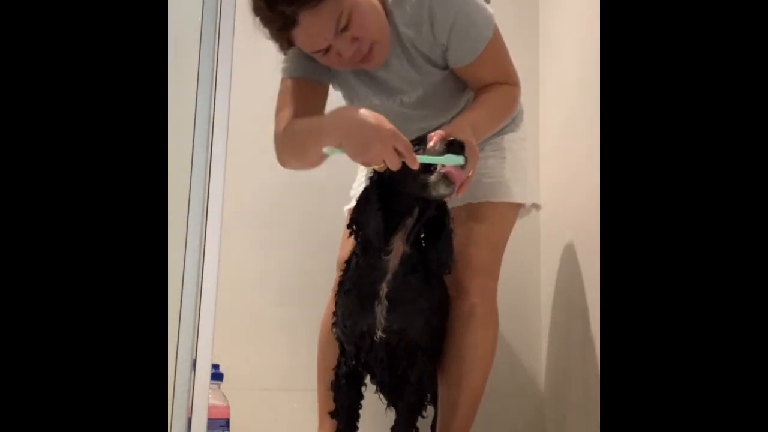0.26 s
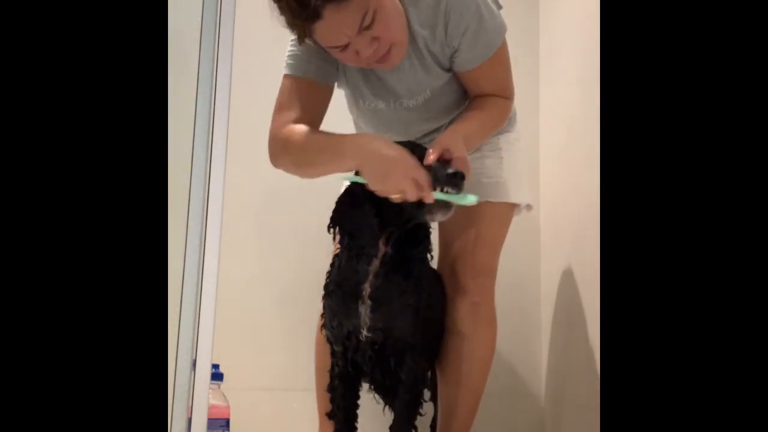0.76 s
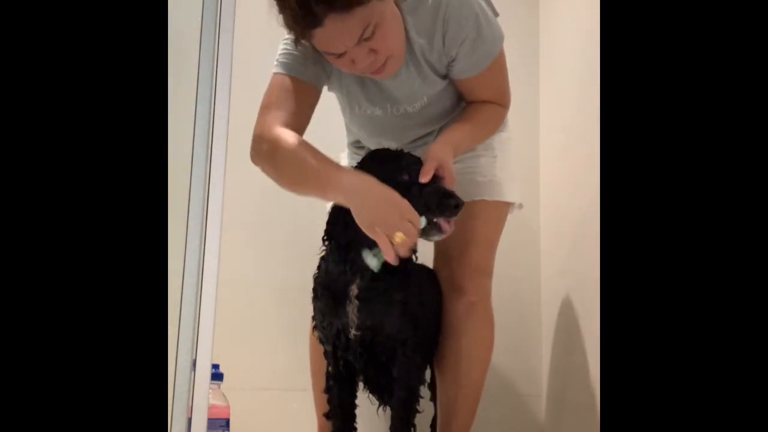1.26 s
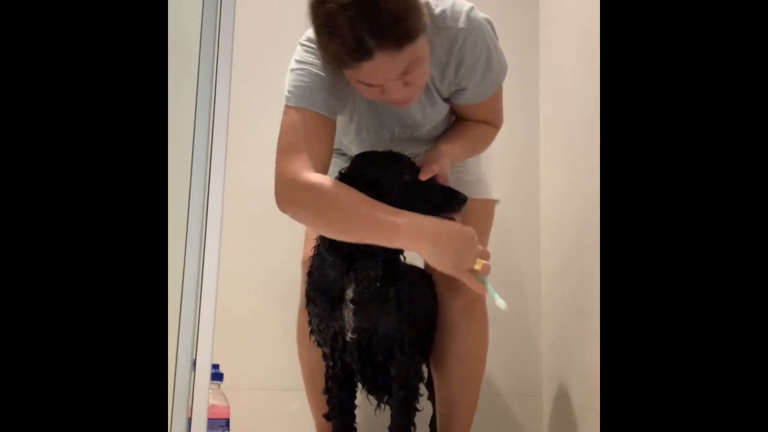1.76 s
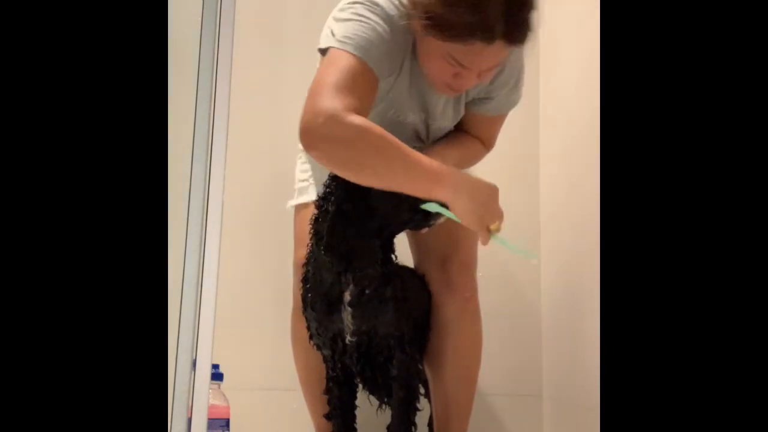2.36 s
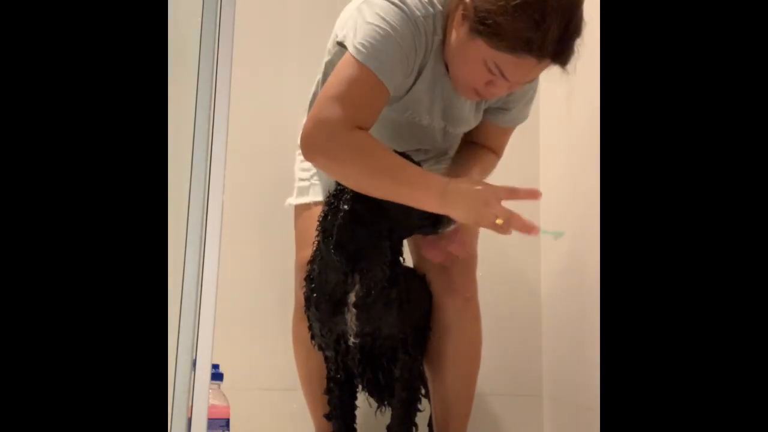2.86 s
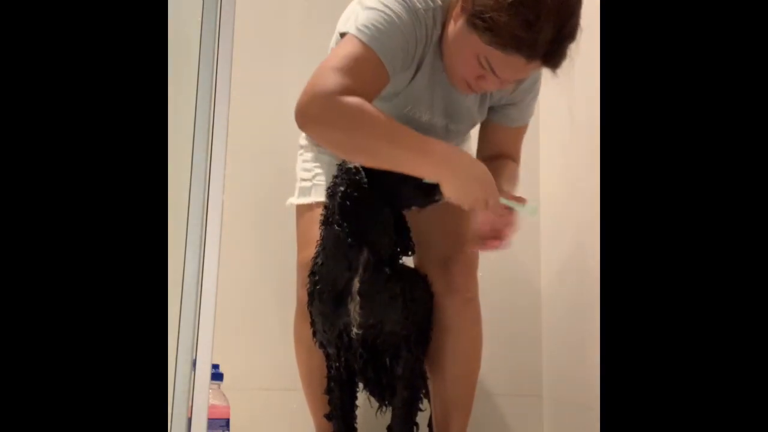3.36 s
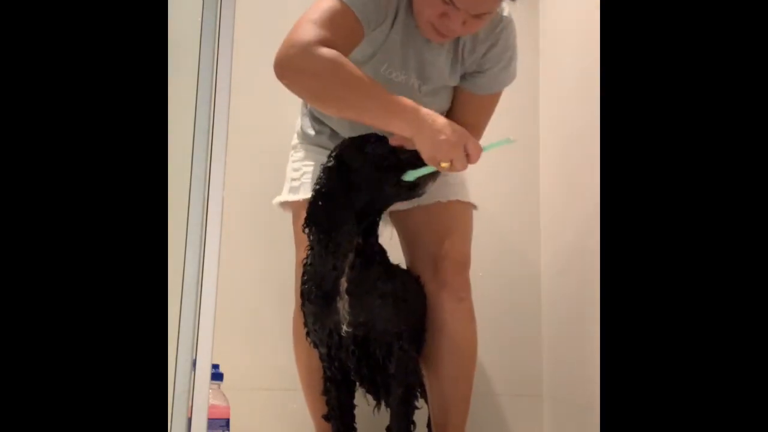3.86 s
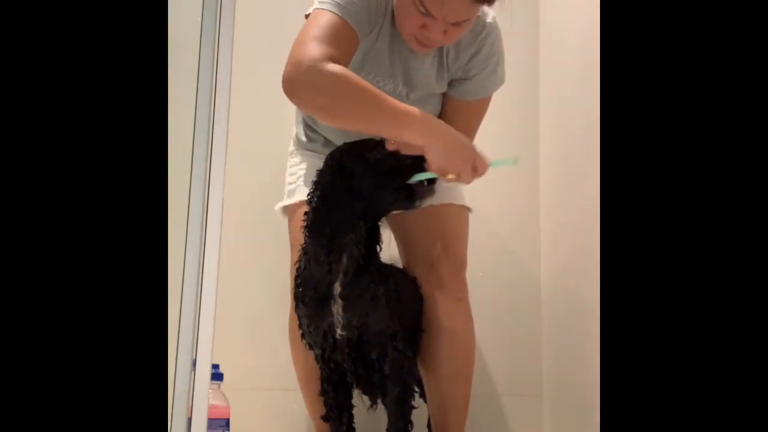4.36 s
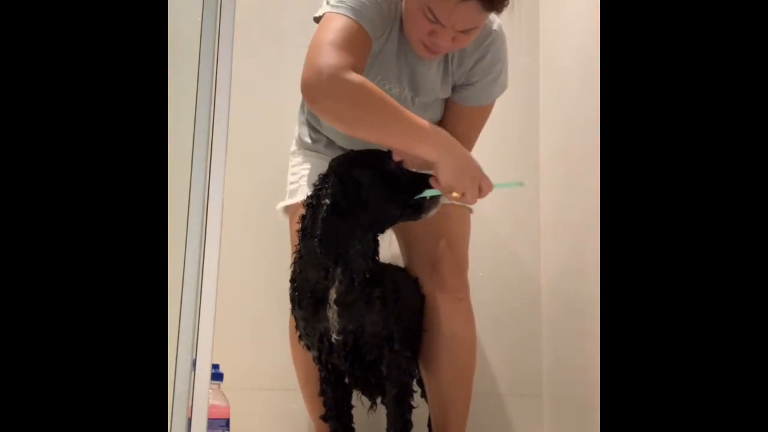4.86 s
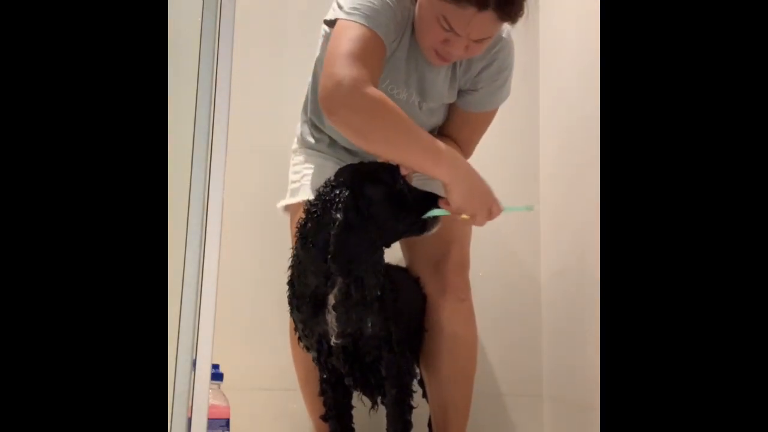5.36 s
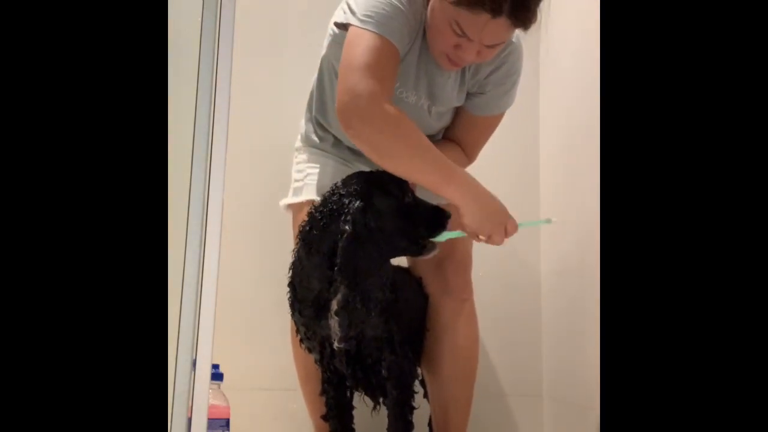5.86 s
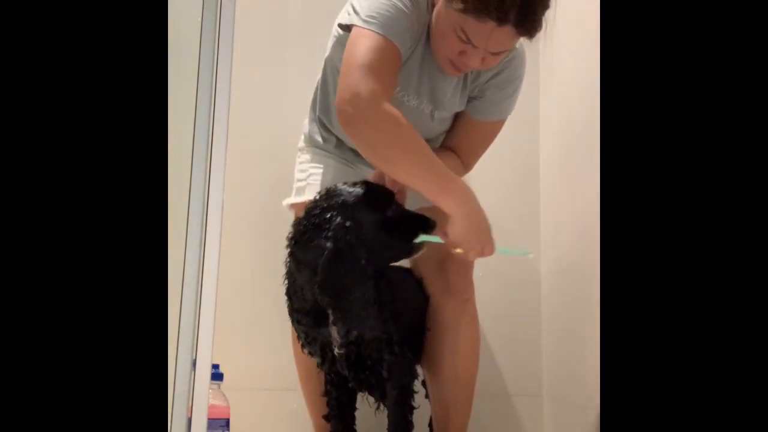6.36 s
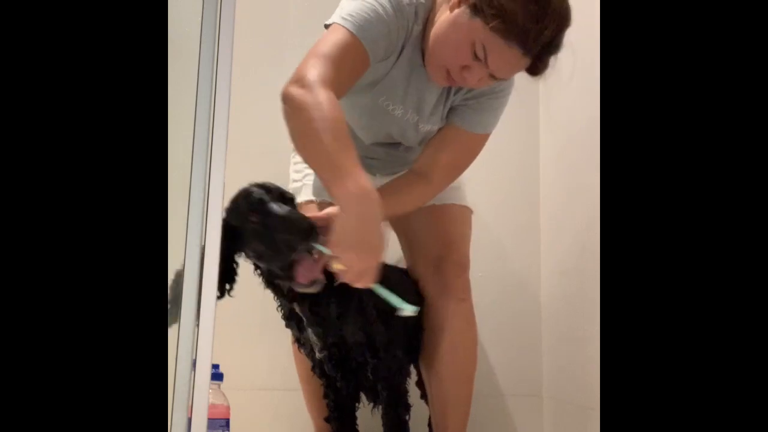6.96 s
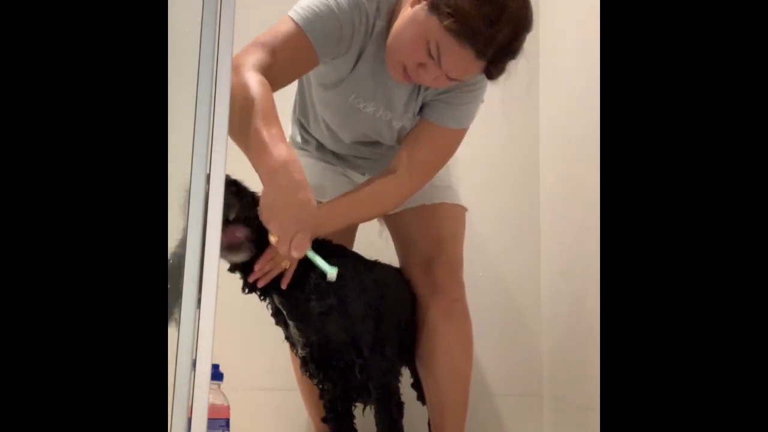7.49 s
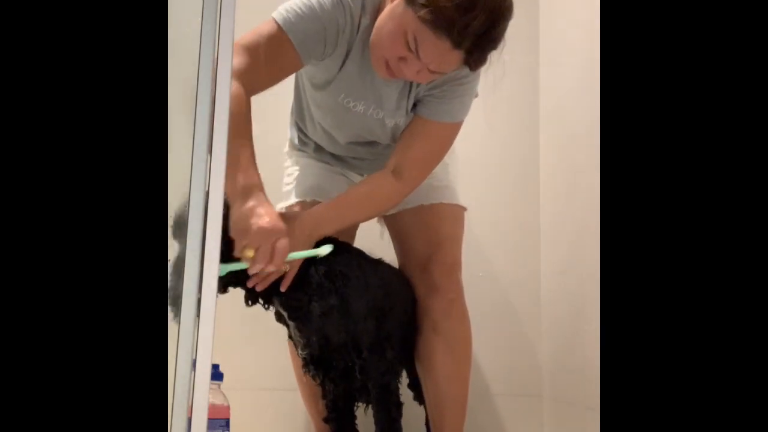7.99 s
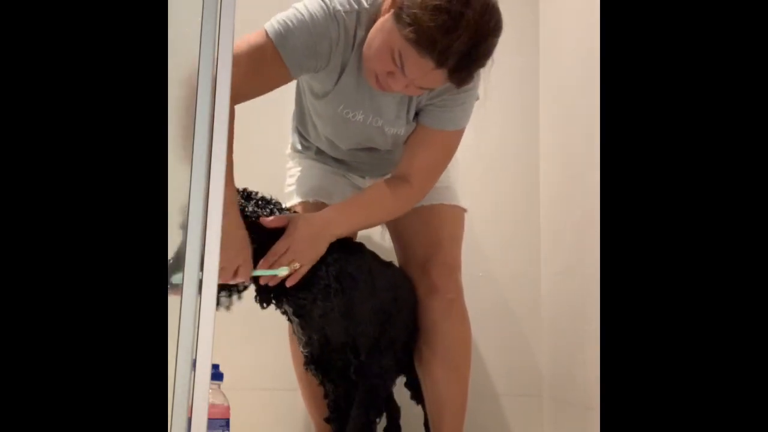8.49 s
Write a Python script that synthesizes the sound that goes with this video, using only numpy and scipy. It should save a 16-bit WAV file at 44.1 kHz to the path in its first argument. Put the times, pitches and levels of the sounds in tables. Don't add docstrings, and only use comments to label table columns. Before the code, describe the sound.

A toothbrush scrubs a wet dog's teeth in quick hissing strokes, with hollow mouth clicks and smacks, over a low fan rumble in a tiled bathroom.

```python
import sys
import numpy as np
from scipy import signal
from scipy.fft import rfft, irfft, next_fast_len
from scipy.io import wavfile
from scipy.ndimage import uniform_filter1d, map_coordinates

SR = 44100
rng = np.random.default_rng(int(sys.argv[2]) if len(sys.argv) > 2 else 0)


def gain_from_db(level_db):
    decades = np.asarray(level_db, float) / 20
    return 10 ** decades


def to_wav(sig):
    pcm = np.clip(np.atleast_2d(sig), -1, 1) * 32767
    pcm = np.round(pcm).astype(np.int16)
    wavfile.write(sys.argv[1], SR, pcm.T)


N = 384993

# start_s, peak_db
BRISTLE_FLICKS = [(0.406, -48), (0.535, -40), (1.602, -49), (1.68, -44), (1.7463, -47), (2.0855, -48),
                  (2.549, -43.5), (2.694, -41), (3.0805, -47), (3.096, -37), (3.2094, -40), (3.253, -38),
                  (3.8531, -48), (4.0877, -43), (4.3045, -48), (4.3327, -43.5), (4.511, -54), (4.6778, -45),
                  (5.474, -51), (5.5802, -47), (6.3227, -39), (6.784, -45), (6.8974, -44), (7.4325, -53),
                  (7.585, -38), (7.992, -43), (8.049, -34)]
# start_s, peak_db, body_db
HEAD_CATCHES = [(0.697, -45, 14), (0.7253, -65, -1), (0.74, -36, 3.5), (0.831, -45, 8), (1.137, -49, -12),
                (1.1458, -28.5, 8), (1.8842, -44, 0.5), (2.1306, -43, -13), (2.1969, -64, 0),
                (3.5224, -48, -5), (4.404, -52, -13), (4.86, -40.5, -5), (4.9432, -43, -5),
                (4.9806, -37, 6.5), (5.764, -36, -3), (5.8142, -54, -5), (6.493, -47.5, 9.5),
                (6.631, -42, 13), (7.1497, -50, 1), (7.3, -48, 11), (8.544, -45.5, 3)]


def unit(x):
    return x / np.sqrt(np.mean(x ** 2) + 1e-20)


def along(points, hz):
    f, v = np.transpose(points)
    return np.interp(np.log(hz + 1), np.log(f + 1), v)


def curves(rows):
    s, *columns = np.transpose(rows)
    return [np.interp(np.arange(N) / SR, s, column) for column in columns]


def during(rows):
    t = np.arange(N) / SR
    return np.clip(np.minimum(t - rows[0][0], rows[-1][0] - t) / .003, 0, 1)


def wobble(rate):
    knots = rng.standard_normal(int(N * rate / SR) + 4)
    return map_coordinates(knots, [np.arange(N) * rate / SR])


def filtered(x, response):
    n = x.shape[-1]
    m = next_fast_len(n + 4096)
    return irfft(rfft(x, m) * response(np.fft.rfftfreq(m, 1 / SR)), m)[..., :n]


def humps(modes, hz):
    return gain_from_db(sum(db / (1 + ((hz - c) * 2 / w) ** 2) for c, w, db in modes))


def tiles(x):
    # pitch_hz, fade_s
    fade_times = [(400, 0.59), (1300, 0.44), (3500, 0.51), (9000, 0.13), (15000, 0.017)]
    hz, t, z = signal.stft(rng.standard_normal((2, SR * 2 // 5)), SR, nperseg=256)
    fade = gain_from_db(-60 * t / along(fade_times, hz)[:, None])
    tail = signal.istft(z * fade, SR, nperseg=256)[1]
    tail_t = np.arange(tail.shape[1]) / SR
    tail = tail * (1 - np.exp(-(tail_t / 0.0039) ** 2))
    return signal.fftconvolve(x[None], tail / np.linalg.norm(tail[0]), axes=1)


def vent():
    # pitch_hz, level_db
    rumble_colour = [(10, -14), (22, 5), (40, -7.5), (80, -7), (300, -14.5), (400, -18.5), (750, -20),
                     (1250, -29), (1550, -24), (1750, -33), (2600, -41), (6000, -34.5), (16000, -56.5)]
    # pitch_hz, width_hz, gain_db
    room_modes = [(60, 22, 7), (99, 12, 8), (137, 12, 7), (177, 12, 8), (240, 16, 5), (290, 16, 4),
                  (350, 30, 5)]
    # time_s, thrum_db
    duct_pull = [(0, -52), (.9, -53), (1.17, -56), (1.6, -47), (2.16, -51), (2.63, -47), (2.8, -53.5),
                 (4.2, -51), (4.9, -53), (7.5, -53.5), (7.71, -53.5), (8.09, -57.5), (8.6, -48),
                 (8.73, -48.5)]
    thrum_db, = curves(duct_pull)
    air_db = -54 + 0.11 * (thrum_db - thrum_db.mean())
    air_db = air_db + 0.6 * wobble(3)

    def colour(hz):
        deep = 1 / (1 + (hz / 88) ** 8)
        share = np.sqrt([1 - deep, deep])[:, None]
        return gain_from_db(along(rumble_colour, hz)) * humps(room_modes, hz) * share

    air, thrum = filtered(rng.standard_normal((2, 2, N)), colour)
    return gain_from_db(air_db) * unit(air) + gain_from_db(thrum_db + 1.84 * wobble(4)) * unit(thrum)


def scratch(spectrum, grain_db, grain_rate, patchy_db):
    noise = gain_from_db(grain_db * wobble(grain_rate)) * rng.standard_normal((2, N))
    z = signal.stft(noise, nperseg=512)[2]
    patches = uniform_filter1d(rng.standard_normal(z.shape[1:]), 9, 0)
    patches = uniform_filter1d(patches, 12, 1)
    grains = signal.istft(z * gain_from_db(patchy_db * unit(patches)), nperseg=512)[1][:, :N]
    return unit(filtered(grains, lambda hz: gain_from_db(along(spectrum, hz))))


def strokes():
    # start_s, hold_s, tips_db, rub_over_tips_db
    brush_strokes = [(0.002, 0.085, -57, -1.5), (0.154, 0.059, -52.5, -6.5), (0.266, 0.095, -53.5, -5),
                     (0.424, 0.052, -50, -14), (0.553, 0.057, -49.5, -8), (0.742, 0.002, -52, -5),
                     (0.846, 0.18, -50.5, -14), (1.149, 0.026, -48, -0.5), (1.403, 0.022, -66.0, -3),
                     (1.678, 0.039, -58, -3.5), (1.885, 0.025, -54.5, -6), (2.145, 0.044, -60.5, -0.5),
                     (2.211, 0.14, -58, -5), (2.376, 0.063, -59, -5), (2.51, 0.082, -68.5, 4.5),
                     (2.644, 0.089, -60, -3.5), (2.793, 0.13, -56, -5), (3.115, 0.001, -54.5, -2.5),
                     (3.22, 0.22, -60, -4.5),
                     (3.565, 0.11, -57.5, -4), (3.768, 0.12, -60, -7), (3.968, 0.056, -59.5, -3.5),
               (4.073, 0.1, -57, -6), (4.305, 0.045, -58.5, -6), (4.431, 0.019, -54, -8),
               (4.537, 0.005, -51, -6.5), (4.683, 0.001, -53.5, -4), (4.873, 0.002, -57.5, -4),
               (4.965, 0.16, -57, 0), (5.202, 0.12, -57.5, -2), (5.475, 0.021, -58, -18),
               (5.576, 0.13, -63.5, 3), (5.767, 0.06, -53.5, 0.5), (5.886, 0.25, -62, -2.5),
               (6.185, 0.035, -60.5, -1.5), (6.329, 0.001, -50.5, -9), (6.506, 0.087, -57, 2),
               (6.654, 0.049, -53.5, -3.5), (6.785, 0.049, -56, -4.5), (6.897, 0.24, -61.5, -2.5),
               (7.158, 0.008, -58, 1), (7.436, 0.051, -51.5, -10), (7.583, 0.14, -57.5, -3.5),
               (7.819, 0.061, -59, -3), (8.041, 0.085, -55.5, 0), (8.232, 0.03, -58, -3),
               (8.362, 0.051, -66, 2), (8.559, 0.0099, -57, 2.5), (8.638, 0.026, -55.5, -0.5)]
    press_db_per_s, lift_db_per_s = 608, 122.5
    tips_rest_db, rub_rest_db = -94, -65
    s, hold, db, rub_db = np.transpose(brush_strokes)[..., None]
    t = np.arange(0, N / SR + .004, .002)
    pressing = (s - t) * press_db_per_s
    lifting = (t - s - hold) * lift_db_per_s
    tips_db = db - np.maximum(0, np.maximum(pressing, lifting))

    def total(parts_db, rest_db):
        return np.sqrt((gain_from_db(parts_db) ** 2).sum(axis=0) + gain_from_db(rest_db) ** 2)

    tips_gain = total(tips_db, tips_rest_db)
    rub_gain = total(tips_db + rub_db, rub_rest_db)
    return curves(np.transpose([t, tips_gain, rub_gain]))


def brush():
    # pitch_hz, level_db
    tips_colour = [(5000, -15.5), (7000, 2), (8200, -6.5), (9500, -1), (11000, 2.5), (13000, -5),
                   (15500, -3), (17000, -9.5)]
    rub_colour = [(1500, -8), (2800, -5.5), (4000, -5), (4800, -1.5), (6400, -0.5), (8200, -1.5),
                  (9500, -8), (12000, -16.5)]
    tips_gain, rub_gain = strokes()
    tips = scratch(tips_colour, grain_db=1.0, grain_rate=360, patchy_db=2.0)
    tips = tips_gain * gain_from_db(-3.5 + 1.5 * wobble(30)) * tips
    rub = scratch(rub_colour, grain_db=1.5, grain_rate=210, patchy_db=2.0)
    rub = rub_gain * gain_from_db(0.48 + 0.86 * wobble(13)) * rub

    snaps, t = np.zeros((2, 2, N + SR)), np.arange(SR // 10) / SR
    shape = gain_from_db(-60 * t / .007) + gain_from_db(-11 - 60 * t / .16)
    flicks = [(*row, -23) for row in BRISTLE_FLICKS]
    for s, db, body_db in flicks + HEAD_CATCHES:
        size = gain_from_db(np.array([db - 3, db + body_db - 7.5]))[:, None, None]
        snaps[..., round(s * SR):][..., :len(t)] += size * shape * rng.standard_normal((2, 2, len(t)))

    def colour(hz):
        return gain_from_db(np.array([along(tips_colour, hz), along(rub_colour, hz)]))[:, None]

    return tips + rub + filtered(snaps[..., :N], colour).sum(axis=0)


def mouth():
    # pitch_hz, level_db
    crack_colour = [(400, -27), (800, -2), (1500, 2), (2900, -4.5), (5000, -9), (8000, -12), (12000, -30),
                    (16000, -33)]
    # start_s, click_db, cavity_hz, click_hz, cavity_db
    wet_smacks = [(0.6942, -42, 1240, 2000, -5.5), (0.695, -43, 1250, 3700, -15),
                  (0.725, -36, 1130, 3650, -25), (0.7256, -38, 1160, 1950, -19),
                  (0.734, -42, 1140, 2950, -21), (0.8283, -38.5, 1050, 3070, -12),
                  (0.845, -37, 1050, 2770, -12), (1.1168, -52, 1260, 3320, -18),
                  (2.17, -51.5, 1490, 2860, -1), (2.171, -47, 1490, 5300, -25), (2.427, -58, 1200, 3650, 6),
                  (2.9171, -49.5, 1006, 2790, -5.5), (4.8753, -44.5, 1077, 2360, -1.5),
                  (5.318, -53, 1500, 3460, -29), (5.33, -51.5, 1500, 3600, -29),
                  (5.748, -54, 1140, 2610, -18), (5.753, -53, 1140, 3500, -20),
                  (5.7612, -34.5, 1285, 2450, -11), (5.7666, -44, 1267, 2930, 6.5),
                  (5.7799, -36, 1093, 4390, -0.5), (6.4904, -47, 1450, 2150, -20),
                  (6.497, -42.5, 1400, 4440, -24), (7.136, -60, 900, 2490, -5),
                  (7.1827, -54.5, 920, 2080, -2.5), (8.0478, -47, 1470, 3250, -43),
                  (8.05, -48.5, 1470, 4840, -43), (8.036, -55, 1470, 3700, -43),
                  (8.6667, -50.5, 1250, 2860, -22)]
    # start_s, click_db, cavity_hz, click_hz, cavity_db
    dry_smacks = [(0.7387, -33, 1160, 3460, -14), (0.7465, -39, 1150, 2840, -11),
                  (0.8769, -33.5, 1054, 1990, -8), (0.899, -38.5, 1100, 1980, 1),
                  (0.9765, -35, 1215, 2150, 2), (1.148, -30.5, 1210, 2060, -17),
                  (1.1479, -32, 1210, 3080, -27), (1.1481, -35.5, 1210, 5370, -25),
                  (2.199, -35, 1150, 2440, -9.5), (3.5887, -53, 1460, 3560, -25),
                  (4.131, -55, 1460, 1610, -10), (4.1619, -34.5, 1420, 2090, -21),
                  (4.3061, -37.5, 973, 2180, -7.5), (4.9816, -33, 1090, 2330, -12.5),
                  (5.088, -33.5, 1333, 2110, -5), (5.077, -45, 1300, 5060, -23),
                  (6.554, -51, 970, 1000, -2.5), (6.5741, -40.5, 1420, 2070, -26),
                  (6.577, -41.5, 1400, 2710, -28)]
    # start_s, click_db, click_hz, cavity_db, crack_db
    gulps = [(0.163, -52, 2040, -15, -10), (0.832, -31.5, 1860, -10, -5.5), (1.1544, -46, 2030, -7, -16),
             (1.8994, -60, 3700, 9, -12), (2.1824, -53, 1520, 4, 0), (2.2064, -51, 1150, 0, 0),
             (3.252, -67, 1650, -12, -4), (3.9454, -52, 3330, -23, -6), (4.176, -46.5, 2880, -2, -5),
             (4.3444, -55.5, 2200, 5, -14), (5.7894, -46, 2270, 2.5, -16), (6.6305, -33.5, 1980, -9.5, -19),
             (6.6312, -38.5, 3120, -24, -21), (8.4570, -53, 760, 2, -25)]
    wet_crack_db, dry_crack_db, shut_cavity_hz = -4.5, -12, 755
    wall_s, wall_db = .0138, -4
    out, t = np.zeros((2, N + SR)), np.arange(SR // 16) / SR

    def ring(hz, fade_s, rise_s):
        return gain_from_db(-60 * t / fade_s) * (1 - np.exp(-t / rise_s)) * np.sin(2 * np.pi * hz * t)

    even = filtered(t == t[64], lambda hz: gain_from_db(along(crack_colour, hz)))
    contacts = [(*row, wet_crack_db) for row in wet_smacks]
    contacts += [(*row, dry_crack_db) for row in dry_smacks]
    contacts += [(s, db, shut_cavity_hz, *rest) for s, db, *rest in gulps]
    for s, db, cavity_hz, click_hz, cavity_db, crack_db in contacts:
        click = gain_from_db(3.5) * ring(click_hz, 0.012, 0.0012)
        click -= gain_from_db(-3.0) * ring(1.306 * click_hz, 0.0073, 0.001)
        click += gain_from_db(-8) * ring(1.57 * click_hz, 0.005, 0.0006)
        click += gain_from_db(-11) * ring(2.4 * click_hz, 0.0044, 0.00051)
        click -= gain_from_db(-17.5) * ring(2.5 * click_hz, 0.005, 0.00022)
        burst = .7 * gain_from_db(-60 * t / .011) * (1 - np.exp(-t / .0008)) * rng.standard_normal(len(t))
        crack = filtered(burst, lambda hz: gain_from_db(along(crack_colour, hz)) * hz / (hz + 2500))
        crack = gain_from_db(crack_db + 9.5) * crack
        cavity = gain_from_db(cavity_db - 5.5) * ring(cavity_hz, 0.025, 0.00086)
        spray = gain_from_db(crack_db + 19) * even
        echoes = tiles(gain_from_db(-15) * click + cavity + spray)
        direct = gain_from_db(0.5) * click + gain_from_db(9) * crack + gain_from_db(6.5) * cavity
        at = round(s * SR)
        out[0, at:][:len(t)] += gain_from_db(db + 6) * direct
        out[:, at + round(wall_s * SR):][:, :len(t)] += gain_from_db(db + wall_db) * (click + cavity)
        out[:, at:][:, :echoes.shape[1]] += gain_from_db(db + 12.5) * echoes
    return out[:, :N]


def cheek():
    # time_s, pitch_hz, level_db
    pocket_hums = [
        [(0.735, 1157, -40), (0.755, 1200, -56), (0.765, 1185, -42), (0.769, 1155, -50), (0.785, 1170, -36.5),
         (0.795, 1140, -62), (0.803, 1150, -39), (0.811, 1176, -49), (0.83, 1072, -43)],
        [(0.83, 1058, -41), (0.852, 1055, -51), (0.866, 1134, -41), (0.878, 1074, -46), (0.884, 1060, -41),
         (0.892, 1130, -44), (0.922, 1084, -57), (0.962, 1113, -48), (0.972, 1190, -66)],
        [(0.976, 1146, -51), (0.986, 1170, -42), (1.004, 1222, -51), (1.02, 1212, -38.5), (1.054, 1233, -61),
         (1.058, 1160, -53), (1.068, 1160, -55), (1.094, 1325, -72), (1.11, 1140, -63)],
        [(4.87, 1116, -64), (4.9, 1109, -51), (4.914, 1036, -61), (4.932, 1136, -55), (4.948, 1105, -61),
         (4.96, 1010, -65), (5.016, 1156, -51), (5.05, 1113, -52), (5.08, 1217, -64)],
        [(5.085, 1204, -61), (5.091, 1220, -46), (5.099, 1324, -54), (5.115, 1297, -50), (5.127, 1220, -62),
         (5.141, 1311, -56), (5.147, 1296, -43), (5.177, 1293, -55), (5.25, 1340, -71)],
    ]
    # time_s, pitch_hz, level_db
    jaw_hums = [
        [(6.632, 761.3, -52), (6.648, 763, -54), (6.678, 751, -55), (6.688, 774.9, -64), (6.696, 740, -53),
         (6.712, 741, -52), (6.726, 750, -58), (6.74, 667, -68)],
        [(8.455, 737.9, -60), (8.459, 742, -50), (8.487, 707.4, -49), (8.491, 702, -57), (8.511, 696, -50),
         (8.523, 733.3, -50), (8.565, 725, -50), (8.6, 674, -61)],
    ]
    # time_s, pitch_hz, level_db
    whistle = [
        (8.465, 1608, -62),
        (8.475, 1725, -45),
        (8.483, 1770, -47),
        (8.509, 1670, -53),
        (8.515, 1870, -47),
        (8.519, 1893, -67),
        (8.53, 1891, -57),
    ]
    width_hz, steady = 110, 1.4
    out = np.zeros((2, N))
    for rows in [*pocket_hums, *jaw_hums, whistle]:
        hz, db = curves(rows)
        fuzz = np.array([steady + wobble(width_hz) + 1j * wobble(width_hz) for port in range(2)])
        fuzz = fuzz * [[1], [.75]]
        tone = (fuzz * np.exp(2j * np.pi * np.cumsum(hz) / SR)).real
        out += gain_from_db(db + 1.5 * wobble(300)) * during(rows) * unit(tone)
    return out


def slurp():
    # time_s, level_db
    swallow = [
        (8.456, -49),
        (8.47, -45),
        (8.49, -41),
        (8.52, -44),
        (8.55, -48.5),
        (8.575, -65),
        (8.6, -69),
    ]
    # pitch_hz, width_hz, level_db
    throat_modes = [(495, 270, -1.5), (730, 220, 3), (1150, 236, 3), (1450, 570, 0.5), (1950, 250, 0.5),
                    (2390, 430, -8)]
    froth = gain_from_db(2.1 * wobble(220)) * rng.standard_normal(N)

    def throat(f):
        total = 0
        for k, (c, w, db) in enumerate(throat_modes):
            resonance = 1j * f * w / (c * c - f * f + 1j * f * w)
            total = total + gain_from_db(db) * resonance * (-1) ** k
        return total

    near = gain_from_db(curves(swallow)[0] - 4.0) * during(swallow) * unit(filtered(froth, throat))
    return near * [[1], [.6]] + gain_from_db(-5.5) * tiles(near)[:, :N]


def scene():
    return vent() + brush() + mouth() + cheek() + slurp()


def drop_hidden(ports, under_db, dead_db, top_db):
    sudden_times = [
        .725,
        1.125,
        1.147,
        2.131,
        3.09,
        4.31,
        4.985,
        5.58,
        5.761,
        8.05,
    ]
    window = signal.windows.kaiser_bessel_derived(2048, 4 * np.pi)
    frame = dict(fs=SR, window=window, nperseg=2048)
    pair = np.array([ports[0] + ports[1], ports[0] - ports[1]]) / 2
    pair = np.pad(pair, ((0, 0), (49, 0)))
    hz, t, z = signal.stft(pair, **frame)
    hz, lines = hz[:1024, None], np.abs(z[:, :1024]) ** 2
    bands = np.repeat(lines.reshape(2, 32, 32, -1).mean(axis=2), 32, axis=1)
    sudden = np.abs(t[:, None] - sudden_times).min(axis=1) < .012
    snap_times = [row[0] for row in BRISTLE_FLICKS + HEAD_CATCHES]
    snapping = np.abs(t[:, None] - snap_times).min(axis=1) < .02
    kept = (bands > gain_from_db(2 * under_db) * bands[::-1]) | (hz < 6500) | sudden
    alive = lines > gain_from_db(2 * dead_db) * bands.sum(axis=0)
    kept = kept & (alive | (hz < 1500) | sudden | snapping)
    kept = kept & ((hz < 15800) | (sudden & (bands > gain_from_db(2 * top_db))))
    z = z * np.pad(kept, ((0, 0), (0, 1), (0, 0)))
    mid, side = signal.istft(z, **frame)[1][:, 49:N + 49]
    return np.array([mid + side, mid - side])


def low_pass(x):
    return signal.sosfilt(signal.butter(12, 16510, fs=SR, output="sos"), x)


def record(dry):
    # pitch_hz, width_hz, gain_db
    port_modes = [(4000, 500, 4), (6400, 900, 3), (8200, 500, 7)]
    # pitch_hz, likeness (0 to 1)
    likeness = [(100, 1), (250, .97), (500, .45), (700, .55), (1000, .2), (1400, .55), (2000, .7),
                (2700, .25), (3800, .75), (6500, .88), (8500, .95), (11000, .85), (13500, .77), (16000, .9)]
    # pitch_hz, lead_radians
    left_lead = [(100, 0), (500, -.2), (850, .6), (1250, -.2), (2400, -1), (3300, 1.2), (4000, 1.6),
                 (6500, 2.5), (8500, 3.14), (10500, 3.65), (12000, 4.3), (14000, 5.1), (16000, 6.2)]
    # pitch_hz, difference_db
    left_tilt = [(70, 0), (150, -1.7), (1000, -1.2), (2500, 0)]

    def share(hz):
        turn = np.arccos(along(likeness, hz)) / 2
        return humps(port_modes, hz) * [np.cos(turn), np.sin(turn)]

    def skew(hz):
        left = gain_from_db(along(left_tilt, hz) / 2) * np.exp(.5j * along(left_lead, hz))
        return np.array([left, 1 / left])

    front, lateral = filtered(dry, share)
    ports = filtered(np.array([front + lateral, front - lateral]), skew)
    mix = drop_hidden(ports, under_db=-9.5, dead_db=-10, top_db=-85.5)
    return low_pass(mix)


dry = scene()
out = record(dry)
to_wav(out)
```